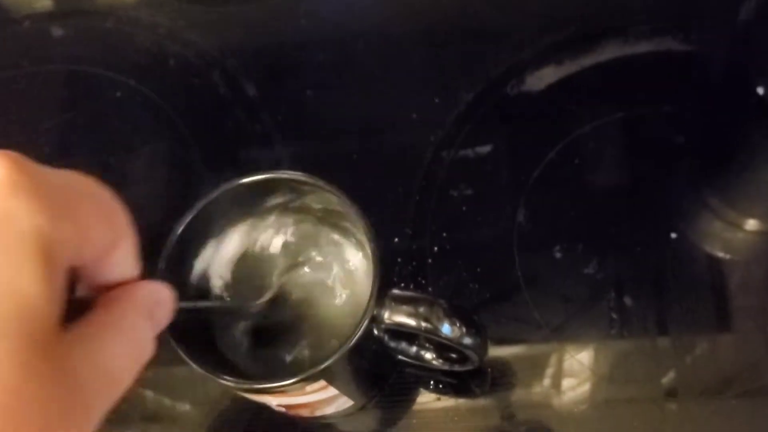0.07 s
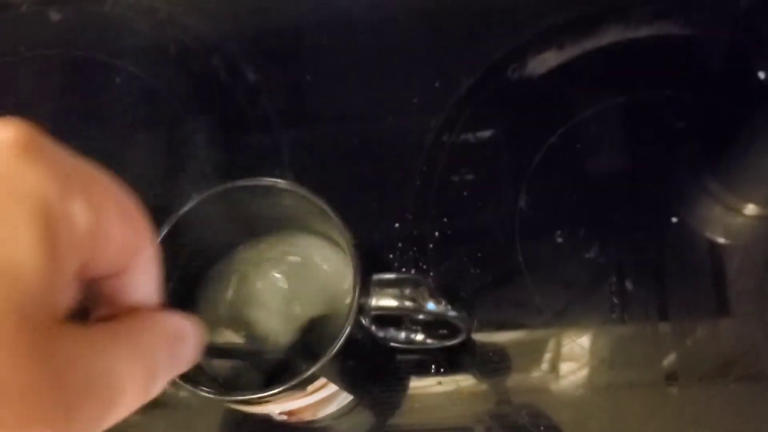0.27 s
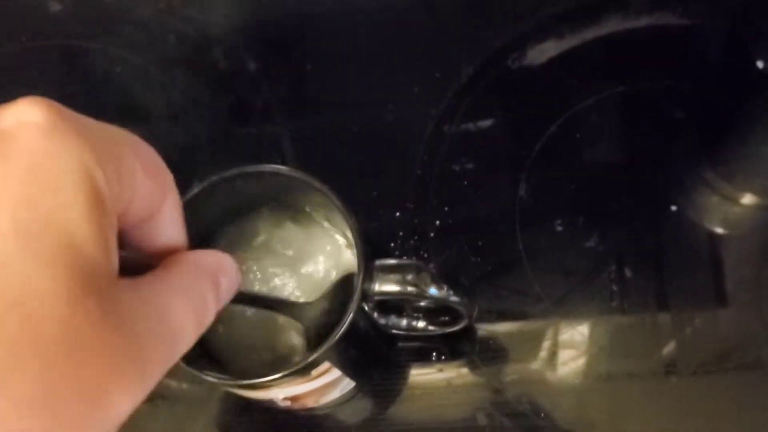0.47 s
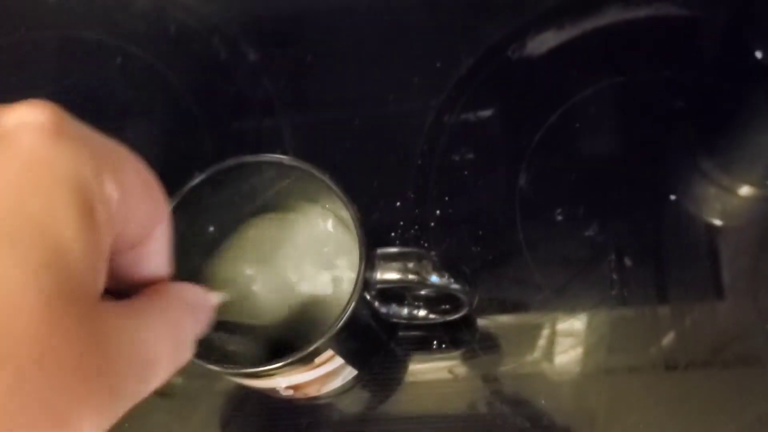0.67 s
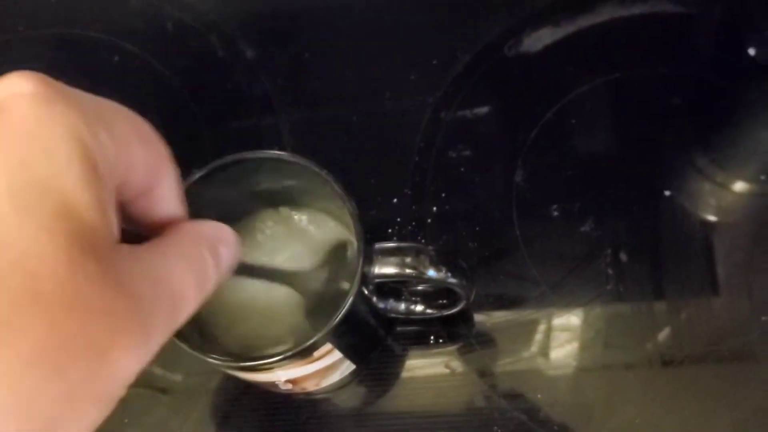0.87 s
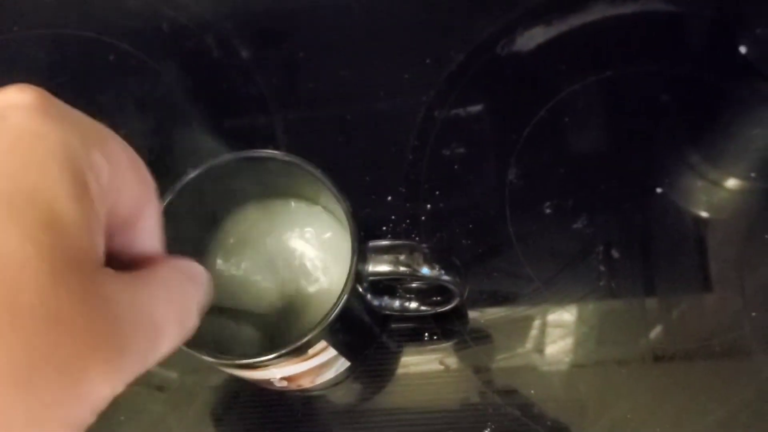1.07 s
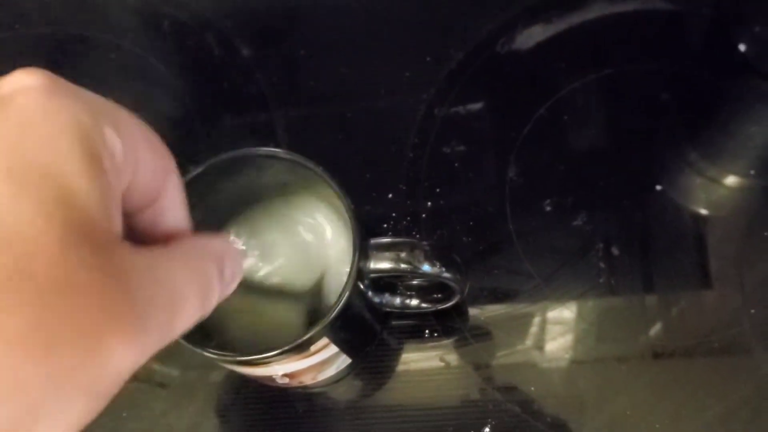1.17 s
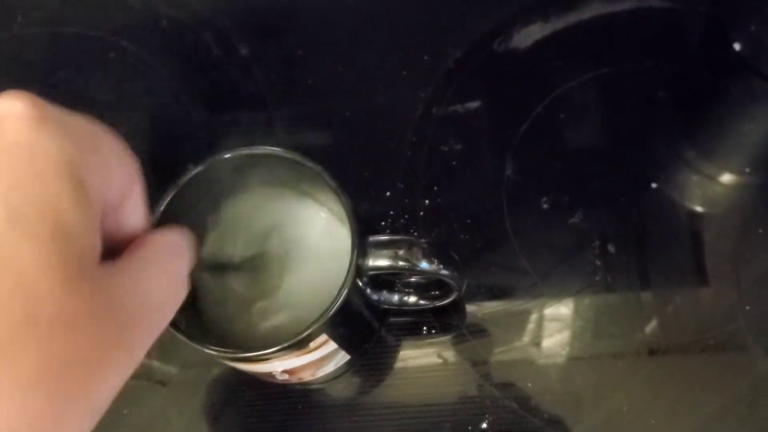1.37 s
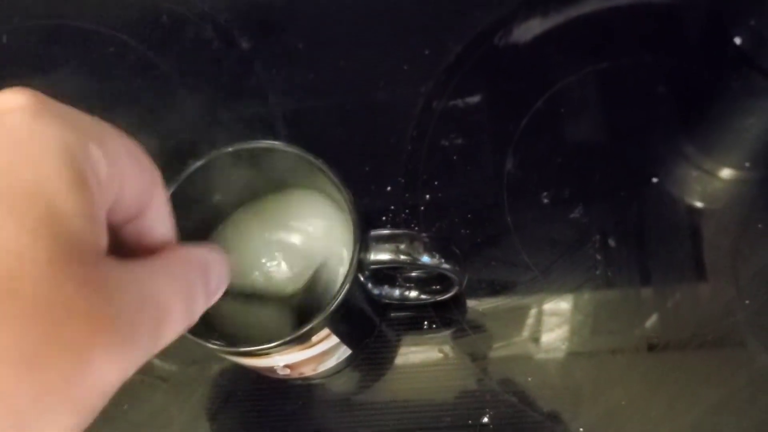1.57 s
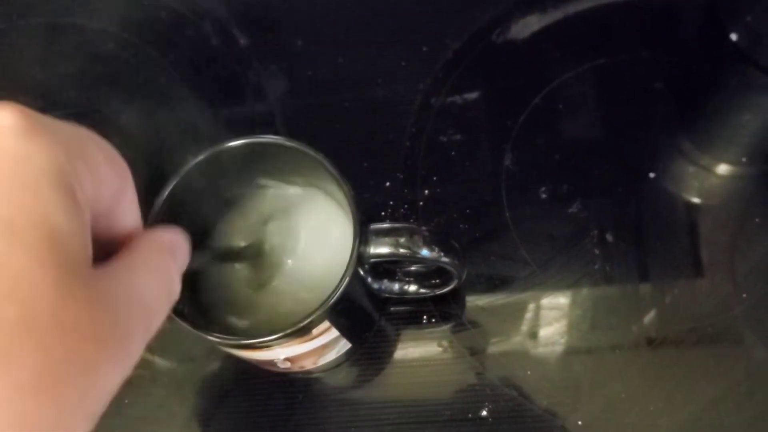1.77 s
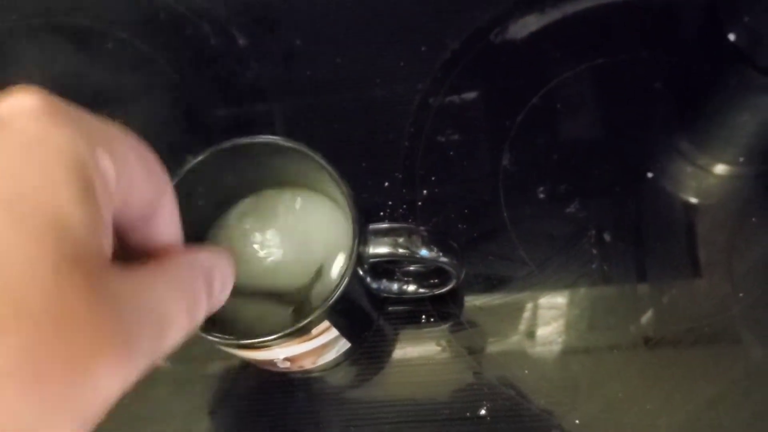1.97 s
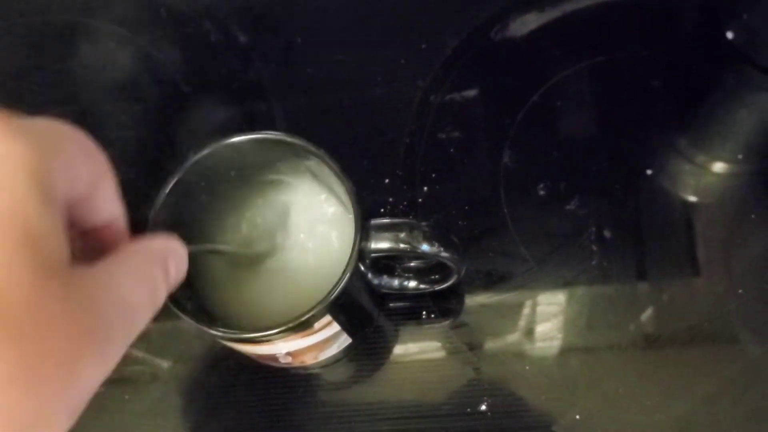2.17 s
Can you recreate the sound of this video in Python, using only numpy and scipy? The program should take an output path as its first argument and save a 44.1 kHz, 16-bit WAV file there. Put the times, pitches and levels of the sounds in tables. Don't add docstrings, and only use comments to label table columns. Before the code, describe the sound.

A metal spoon stirs a drink in a mug, clinking brightly against the wall in quick rounds

```python
import sys
import numpy as np
from scipy import signal
from scipy.fft import rfft, irfft
from scipy.io import wavfile
from scipy.ndimage import uniform_filter1d

SR = 44100
rng = np.random.default_rng(int(sys.argv[2]) if len(sys.argv) > 2 else 0)


def materialize(psi):
    bounded = np.clip(np.atleast_2d(psi).T, -1, 1)
    quanta = np.round(bounded * 32767).astype(np.int16)
    wavfile.write(sys.argv[1], SR, quanta)


def undo_db(level):
    steps = np.asarray(level, float) / 20
    return 10 ** steps


N = 97284
TIME = np.arange(N) / SR
FFT_HZ = np.arange(N // 2 + 1) * SR / N

CONTACT_S = 0.032
SPLIT, SPLIT_DB = 0.008, -4


def at_hz(points, hz):
    table_hz, values = np.transpose(points)
    return np.interp(np.log(hz + 1e-9), np.log(table_hz), values)


def colour(x, spectrum):
    gain = undo_db(at_hz(spectrum, FFT_HZ))
    return irfft(rfft(x) * gain / np.sqrt(np.mean(gain ** 2)), N)


def filtered(x, order, hz, kind):
    return signal.sosfilt(signal.butter(order, hz, kind, fs=SR, output="sos"), x)


def wander(per_s):
    return np.interp(TIME * per_s, np.arange(400), rng.standard_normal(400))


def patchy(x, depth_db, per_s):
    edges = 250 * 2 ** np.arange(0, 6.1, 0.5)
    out = 0
    for band in zip(edges, edges[1:]):
        out = out + undo_db(depth_db * wander(per_s)) * filtered(x, 2, band, "band")
    return out


def add(out, s, db, hz, t60, rise=0, drop_db=0):
    i = int(s * SR)
    t = np.arange(min(N - i, int(1.6 * t60 * SR))) / SR
    swell = np.minimum(t / 0.001, 1)
    sag_db = drop_db * np.clip((t - CONTACT_S) / 0.016, 0, 1)
    tone = np.sin(2 * np.pi * hz * t * (1 + rise * t))
    out[i:i + len(t)] += swell * undo_db(db + sag_db - 60 * t / t60) * tone


def burst(rows, t60, per_s, spectrum):
    envelope = 0
    for s, db in rows:
        envelope = envelope + undo_db(db - 60 * np.maximum(TIME - s, 0) / t60) * (TIME >= s)
    clicks = rng.standard_normal(N) * (rng.random(N) < per_s / SR) * np.sqrt(SR / per_s)
    return colour(envelope * clicks, spectrum)


def strikes(rows, modes, spread_db, drop_db=0, detune=0.0027):
    out = np.zeros(N)
    luck = rng.standard_normal((len(modes), len(rows), 4))
    for (hz, level_db, t60), draws in zip(modes, luck):
        mode = np.zeros(N)
        for (s, db), (a, b, c, d) in zip(rows, draws):
            base_db = db + level_db
            add(mode, s, base_db + spread_db * a, hz * (1 + detune * b), t60, drop_db=drop_db)
            twin_db = base_db + spread_db * d + SPLIT_DB
            add(mode, s, twin_db, hz * (1 + SPLIT * c), 1.18 * t60, drop_db=drop_db)
        rough = min(hz / 4950, 3) ** 2 / 2
        out += mode * (1 + rough * wander(170)) / np.sqrt(1 + rough ** 2)
    return out


def chatter(rows, low_hz, high_hz, t60, count):
    out = np.zeros(N)
    for (s, db), luck in zip(rows, rng.random((len(rows), count, 3))):
        for a, b, c in luck:
            start = min(s + CONTACT_S * a ** 3, 2.2)
            hz = low_hz * (high_hz / low_hz) ** (b ** 1.3)
            add(out, start, db - 8 * c - 6 * a, hz, t60 * (0.5 + c))
    return out


# (pitch [Hz], level [dB per Hz])
AIR = [(25, -6), (50, 24), (100, 20), (200, 11), (500, 7), (1200, -40)]


def room_air():
    return undo_db(-55.5) * colour(rng.standard_normal(N), [*AIR, (3500, -140)])


# (pitch [Hz], time to fall 60 dB [s])
ROOM = [(150, 0.3), (1000, 0.097), (4000, 0.23), (15000, 0.19)]


def kitchen(x):
    t = np.arange(SR // 2) / SR
    edges = 60 * 2.0 ** np.arange(9)
    white, echo = rng.standard_normal((2, len(t))), 0
    for low, high in zip(edges, edges[1:]):
        a, b = filtered(white, 2, [low, high], "band")
        t60 = at_hz(ROOM, low * 2.32)
        alike = 1 / (1 + (low / 700) ** 2)
        pair = np.array([a, alike * a + np.sqrt(1 - alike ** 2) * b])
        echo = echo + pair * undo_db(-60 * t / t60) / np.sqrt(t60 * SR / 13.6)
    echo = echo * (t > 0.0023)
    return signal.fftconvolve(x[None], echo, axes=1)[:, :N]


# (time [s], level [dB])
SWIRL = [(0, -55), (0.201, -36.5), (.31, -62), (.45, -43.5), (.58, -43.5), (.76, -60.5), (0.896, -43),
         (1.03, -49), (1.16, -56.5), (1.32, -44), (1.44, -45), (1.581, -57.5), (1.718, -44.5),
         (1.852, -45.5), (2.0, -61), (2.2, -43)]
# (pitch [Hz], level [dB per Hz])
WATER = [(180, -73), (300, -8.5), (762, -8.5), (1210, -8), (1390, -28), (1510, -8.5), (1640, -10),
         (4440, -16), (16000, -34.5)]
# (time [s], level [dB], pitch [Hz], time to fall 60 dB [s])
PLOPS = [
    (.004, -10.5, 3920, 0.04),
    (0.013, -21, 3086, 0.059),
    (.060, -20.5, 3450, 0.078),
    (0.5236, -19, 1300, 0.019),
    (0.525, -30.5, 2170, 0.02),
    (1.089, -19, 3730, 0.05),
    (1.845, -39, 2520, 0.04),
    (.013, -15, 4980, 0.018),
    (1.842, -38, 1260, .03),
]


def drink():
    plops, fizz = np.zeros(N), np.zeros(N)
    for s, db, hz, t60 in PLOPS:
        add(plops, s, db, hz, t60, rise=0.25)
    mouth_hz = 1375 * (1 + 0.035 * wander(12))
    fizz_per_s = 470
    for a, b, c in rng.random((int(fizz_per_s * N / SR), 3)):
        hz = mouth_hz[int(a * N)] * (1 + 0.12 * (2 * b - 1))
        add(fizz, a * N / SR, 4.6 * np.log(c + 0.0092), hz, 43 / hz, rise=2.0)
    level = undo_db(np.interp(TIME, *np.transpose(SWIRL)))
    wash = np.array([colour(w, WATER) for w in rng.standard_normal((2, N))])
    wash = patchy(wash, depth_db=2.2, per_s=50)
    return plops + level * undo_db(-4.5) * fizz / fizz.std(), level * wash


# (time [s], level [dB], extra rattle [dB])
KNOCKS = [(.004, -28, 6.5), (0.0579, -27.5, 7.5), (0.1365, -29.5, 17.5), (0.362, -20, 6), (0.803, -26, -1),
          (1.2222, -23.5, 3.5), (1.6218, -23, 6.5), (1.633, -33, 5), (2.1052, -29.5, 1), (2.1752, -23, 7),
          (2.197, -31, 12), (.013, -42.5, 7.5), (.071, -34.5, -1.5), (.113, -35, -1), (2.1125, -39.5, 12),
          (2.139, -36, 4), (1.236, -35.5, 2)]
# (time [s], level [dB])
ROCKS = [(0.194, -41.5), (0.236, -38.5), (0.295, -36.5), (0.441, -54.5), (0.631, -39.5), (0.723, -40),
         (0.836, -55), (1.084, -39.5), (1.107, -41), (1.469, -40), (1.513, -38), (1.88, -38.5),
         (1.925, -43)]
# (pitch [Hz], level [dB], time to fall 60 dB [s])
HOB = [(135.7, -11.5, 0.28), (329.3, -12.5, 0.15), (468.5, -5, 0.14), (704, -12.5, 0.22), (810, -13, 0.14),
       (920, -4, 0.028), (1220, -10, 0.081), (1373, -16.5, 0.18), (1372, -6.5, 0.12), (1650, -5, 0.06)]
# (pitch [Hz], level [dB per Hz])
RATTLE = [(200, 1), (500, -2), (1400, -10), (2300, 4), (3300, -4.5), (5000, -8.5), (6500, -22.5)]
# (pitch [Hz], level [dB per Hz])
RUMBLE = [(120, -44), (250, 27), (500, 22), (900, 7), (2000, -11)]


def hob():
    plate_drop_db = -9
    knocks = [(s, db) for s, db, _ in KNOCKS]
    out = strikes(knocks, HOB, spread_db=3.5, drop_db=plate_drop_db, detune=0.025)
    rattles = [(s, db + rattle - 3.5) for s, db, rattle in KNOCKS]
    out += burst(rattles, 0.085, 1500, RATTLE)
    rock_modes = [(144.6, 0, 0.3), (HOB[2][0], -0.5, 0.07)]
    soft = strikes(ROCKS, rock_modes, spread_db=0, drop_db=plate_drop_db)
    out += burst([(s, db - 5.5) for s, db in ROCKS], 0.14, 3200, RUMBLE)
    return out + filtered(soft, 1, 720, "low")


SPARKLE_S = 0.014

# (time [s], level [dB])
TICKS = [
    (.0573, -38.5),
    (.3446, -24.5),
    (.357, -35),
    (.7966, -25),
    (1.1882, -34),
    (1.206, -34.5),
    (1.6212, -28.5),
    (2.0123, -34.5),
]
# (pitch [Hz], level [dB], time to fall 60 dB [s])
SPOON = [(5060, -6.5, 0.05), (7010, -9, 0.28), (7070, -14.5, 0.15), (8260, -10, 0.15), (8930, -29.5, 0.36),
         (9450, -8, 0.15), (9990, -16.5, 0.11), (11530, -14, 0.033), (13800, -4, 0.043)]
# (pitch [Hz], level [dB per Hz])
TICK_CRACK = [(600, 10), (1500, 12), (4000, 13), (8000, 4.5), (11000, -13), (15200, -6)]


def spoon():
    out = strikes(TICKS, SPOON, spread_db=-6.0)
    out += undo_db(2.5) * chatter(TICKS, 5580, 16380, SPARKLE_S, count=24)
    return out + undo_db(-3) * burst(TICKS, 0.14, 18000, TICK_CRACK)


# (time [s], level [dB], pitch [Hz])
FAVOURED = [(.137, -22.5, 2644), (.137, -25, 2750), (.137, -21, 3380), (.137, -24.5, 4824),
            (.137, -30.5, 5810), (.137, -36, 9100), (.137, -34, 9760), (.137, -29, 15200),
            (.3446, -31.5, 8260), (.3446, -35, 9200), (.3616, -26, 4930), (.6065, -21.5, 4950),
            (.6065, -28, 5570), (.620, -24, 6050), (.6065, -39, 14000), (.7966, -29, 7010),
            (.7966, -26, 8260), (.7966, -44, 13800), (1.064, -32, 5610), (1.064, -23, 8830),
            (1.064, -27, 9660), (1.064, -29, 15000), (1.081, -28, 8790), (1.1882, -25.5, 8380),
            (1.1882, -36, 9500), (1.1882, -40, 14500), (1.203, -37, 8320), (1.4541, -26, 5555),
            (1.4541, -29, 4300), (1.4541, -32, 12200), (1.475, -29, 8790), (1.475, -39, 15100),
            (1.482, -41, 3180), (1.6212, -44, 6760), (1.8657, -24, 4380), (1.8657, -23.5, 5045),
            (1.8657, -26.5, 5720), (1.8657, -23, 5850), (1.8657, -27, 6820), (1.8657, -22.5, 8710),
            (1.8657, -27, 9530), (1.8657, -38, 14400), (2.0123, -29, 8540), (2.1745, -26.5, 11530),
            (2.0123, -36.5, 3610), (2.1051, -32, 3080), (2.134, -33.5, 4830), (2.1755, -23.5, 4940),
            (2.1755, -34, 3820), (1.6212, -33, 9640), (1.4537, -31, 5830), (0.6063, -24, 3430),
            (0.6067, -29.5, 2644), (1.8656, -31, 3167), (2.013, -39, 11530)]


def favoured():
    out = np.zeros(N)
    for s, db, hz in FAVOURED:
        t60 = 0.12 * (hz / 5000) ** -0.55
        add(out, s, db, hz, t60)
        add(out, s, db + SPLIT_DB, hz * (1 + SPLIT), t60)
    return out * (1 + 0.16 * wander(140))


# (time [s], level [dB], lowest pitch [Hz], its twin [dB], upper modes [dB])
CLINKS = [(.1366, -11, 2121, -10.5, 0), (.148, -50, 2136, -41, -13), (0.6029, -31.5, 2099, -13, 16.5),
          (.6065, -11, 2075, -2, -0.5), (.620, -25, 2084, -3, 4.5), (.804, -37.5, 1965, 2.5, 16.5),
          (1.064, -12, 2047, -52, 2.5), (1.081, -14, 2066, -24, -2.5), (1.190, -35.5, 2094, 9, 13.5),
          (1.4541, -11.5, 2062, -47, 2.5), (1.477, -17.5, 2062, -7.5, -1.5), (1.623, -31.5, 2097, -3, 7),
          (1.8657, -11, 2044, -11.5, 3), (2.0123, -36.5, 2053, 8, 14.5), (2.1051, -33.5, 2050, 4, 15),
          (2.1745, -20, 2064, -3, 8)]
# (pitch [Hz], level [dB], time to fall 60 dB [s])
MUG = [(2062, 0, 0.14), (2184, 0, 0.27), (2300, -76, 0.012), (3390, -13, 0.043), (3410, -28.5, 0.48),
       (4380, -30.5, 0.083), (4880, -39, 0.25), (5620, -16.5, 0.3), (5830, -23.5, 0.38), (7250, -30, 0.3),
       (8990, -30.5, 0.44), (9580, -27.5, 0.24), (11530, -34, 0.062), (14450, -38, 0.039)]
# (pitch [Hz], level [dB per Hz])
WALL_CRACK = [(300, -16.5), (900, -0.5), (2500, 2.5), (4500, -3), (7500, -0.5), (11000, -11), (15200, -2)]


def mug_wall():
    lift_drop_db = -7.5
    upper, pair = [], np.zeros(N)
    for s, db, hz, twin_db, upper_db in CLINKS:
        upper.append((s, db + upper_db))
        add(pair, s, db, hz, MUG[0][2], drop_db=lift_drop_db)
        add(pair, s, db + twin_db, MUG[1][0], MUG[1][2], drop_db=-0.5)
    out = pair * (1 + 0.69 * wander(120))
    out += strikes(upper, MUG[2:], spread_db=3.5, drop_db=lift_drop_db)
    out += undo_db(-14) * chatter(upper, 1900, 5000, 0.06, count=28)
    out += undo_db(-17) * chatter(upper, 4750, 15930, SPARKLE_S, count=24)
    return out + undo_db(-6) * burst(upper, 0.027, 4400, WALL_CRACK)


def scatter(x):
    t = np.arange(SR // 50) / SR
    clouds = rng.standard_normal((2, len(t))) * undo_db(-60 * t / 0.012)
    clouds /= np.linalg.norm(clouds, axis=1, keepdims=True)
    a, b = signal.fftconvolve(x[None], clouds, axes=1)[:, :N]
    turn = 2 * wander(6)
    side = filtered(a * np.cos(turn) + b * np.sin(turn), 2, 900, "high")
    return undo_db(-1) * side * [[1], [-1]]


# (pitch [Hz], left minus right [dB])
PORT_DB = [(100, -2), (600, 1.5), (1200, -1), (2100, -13.5), (4000, -6), (8000, -0.5), (14000, -9.5)]


def ports(x):
    half = undo_db(at_hz(PORT_DB, FFT_HZ) / 2)
    turn = -2j * np.pi * FFT_HZ
    shine = undo_db(-18.5)
    left = half * (1 + shine * np.exp(turn * 0.001062))
    right = np.exp(turn * 0.000015) * (1 + shine * np.exp(turn * 0.000609)) / half
    return irfft(rfft(x) * np.array([left, right]), N)


def scene():
    bubbles, wash = drink()
    near = mug_wall() + spoon() + hob() + bubbles + favoured()
    side = wash[1] - filtered(wash[1], 1, 600, "low")
    out = ports(near + wash[0]) + scatter(near)
    out += undo_db(-4) * side * [[1], [-1]]
    out += undo_db(1) * kitchen(near) + room_air()
    return out + undo_db(-77) * rng.standard_normal((2, N))


def low_pass(x):
    return signal.sosfilt(signal.butter(12, 16540, fs=SR, output="sos"), x)


def record(dry):
    dry = filtered(dry, 2, 84, "high")
    dry = signal.sosfilt(signal.cheby2(10, 50, 16600, fs=SR, output="sos"), dry)
    limit_db, squeeze, release_db_per_s = -11.5, 0.13, 135
    over_db = np.maximum(20 * np.log10(np.abs(dry).max(0) + 1e-9) - limit_db, 0)
    ramp = release_db_per_s * TIME
    held_db = np.maximum(np.maximum.accumulate(over_db + ramp) - ramp, 0)
    mix = dry * undo_db(-squeeze * uniform_filter1d(held_db, size=45))
    return low_pass(np.clip(mix, -0.97, 0.97))


dry = scene()
out = record(dry)
materialize(out)
```